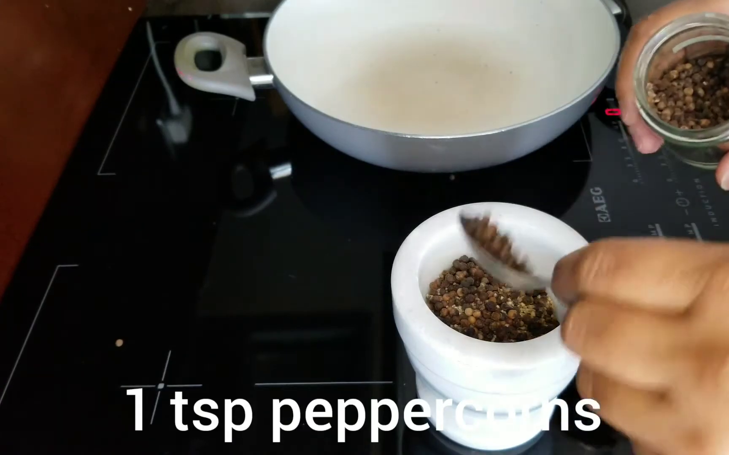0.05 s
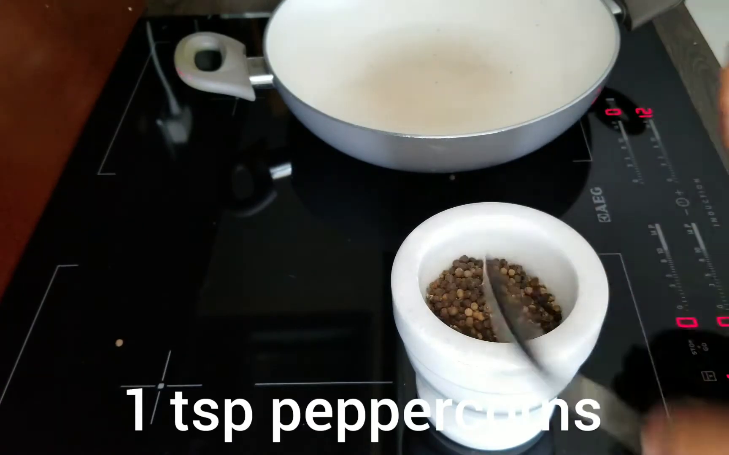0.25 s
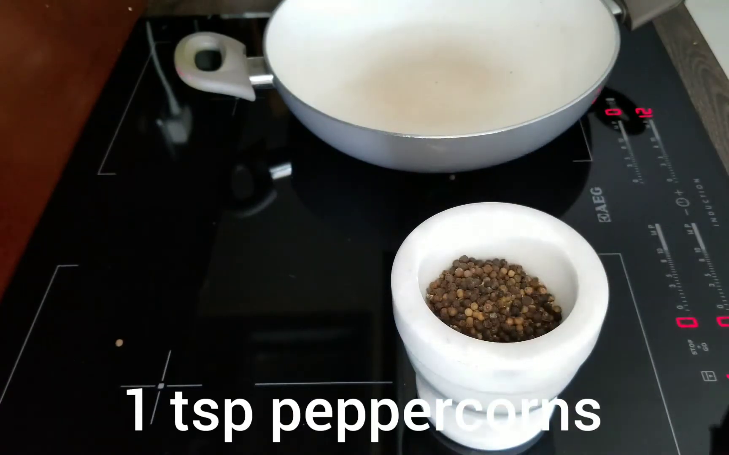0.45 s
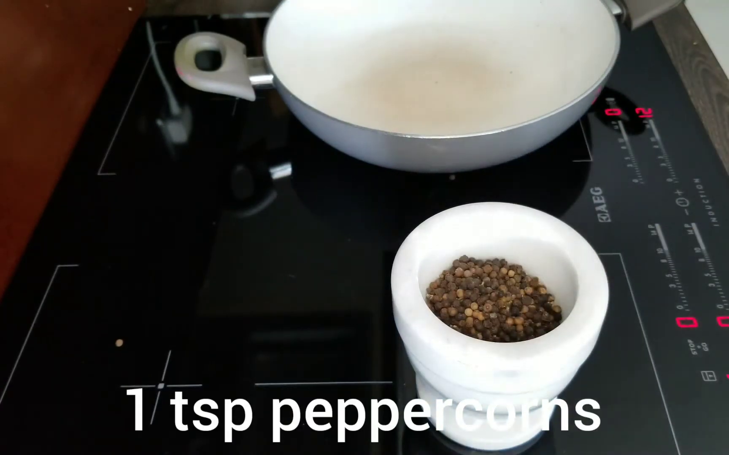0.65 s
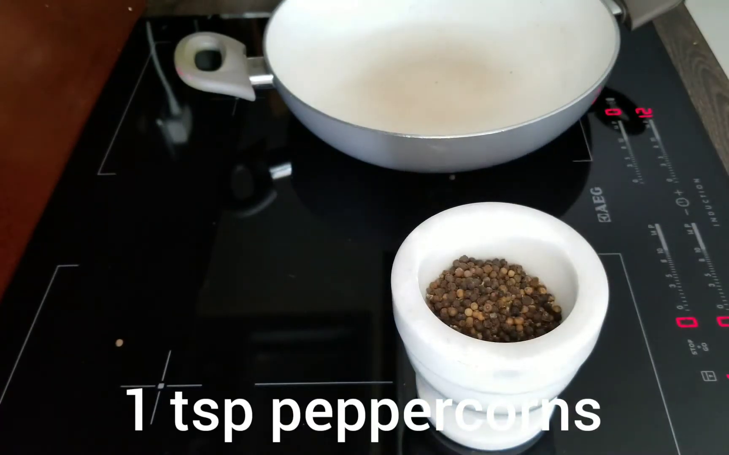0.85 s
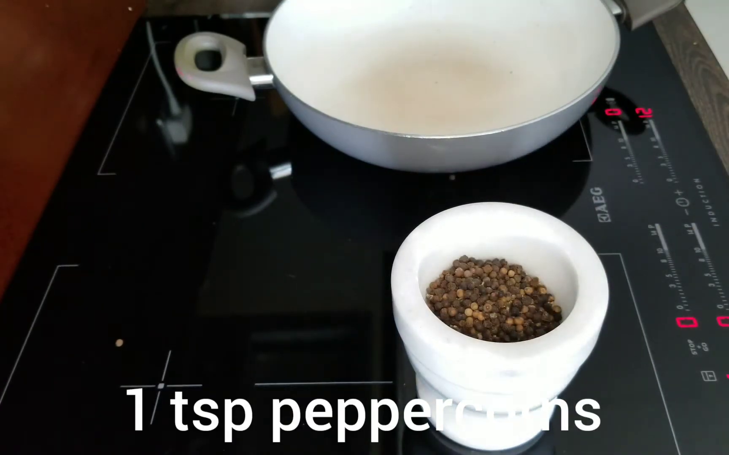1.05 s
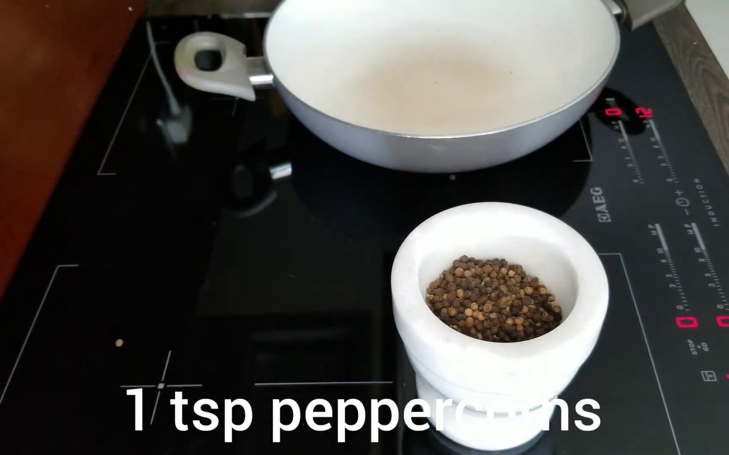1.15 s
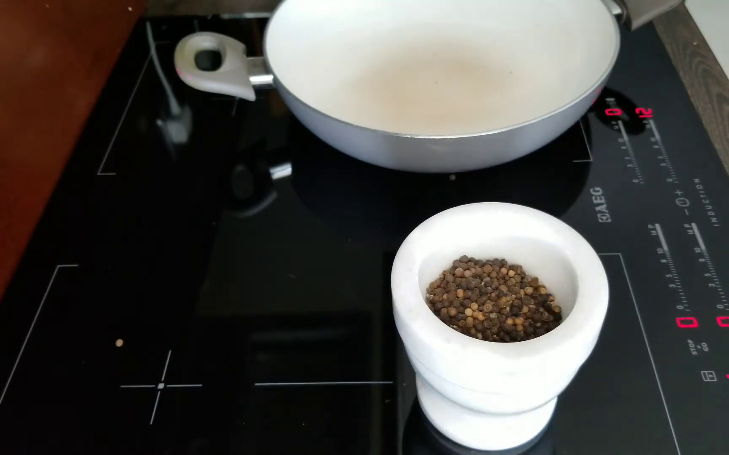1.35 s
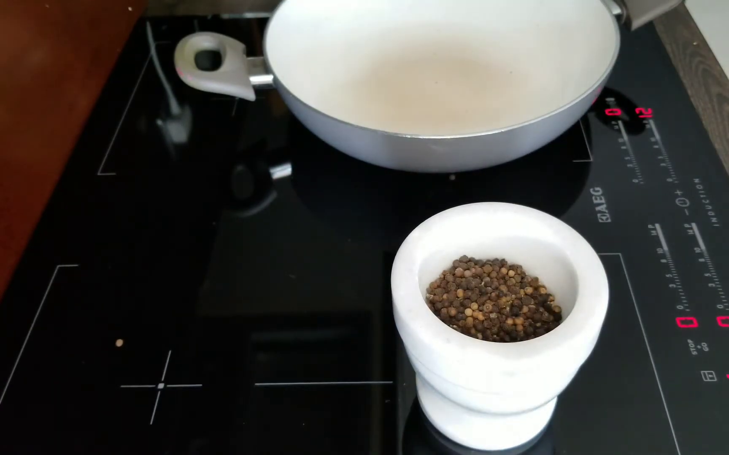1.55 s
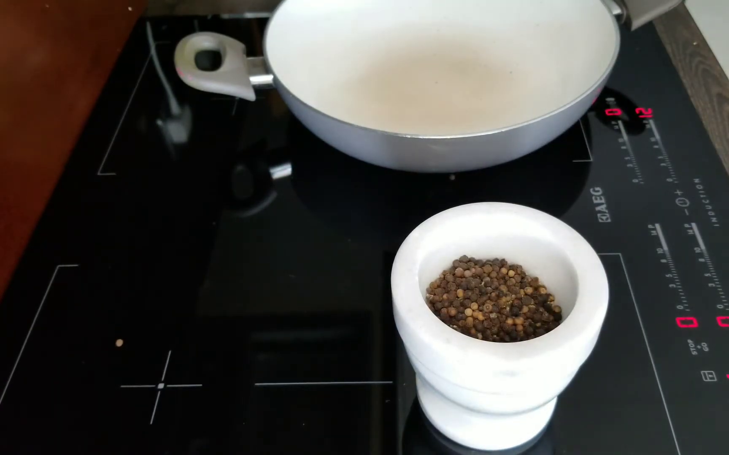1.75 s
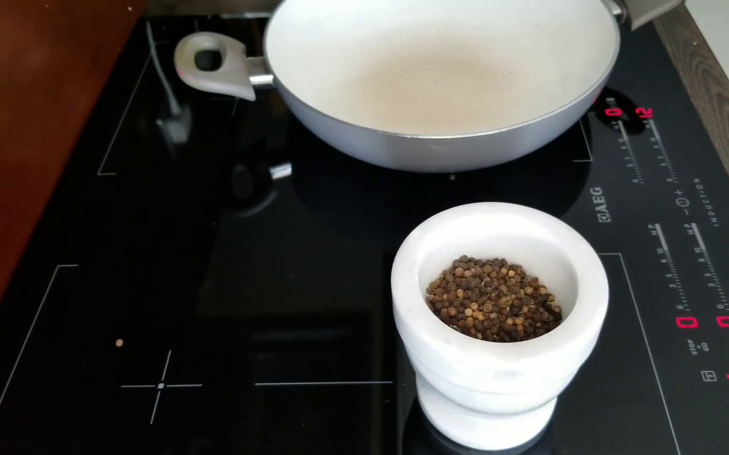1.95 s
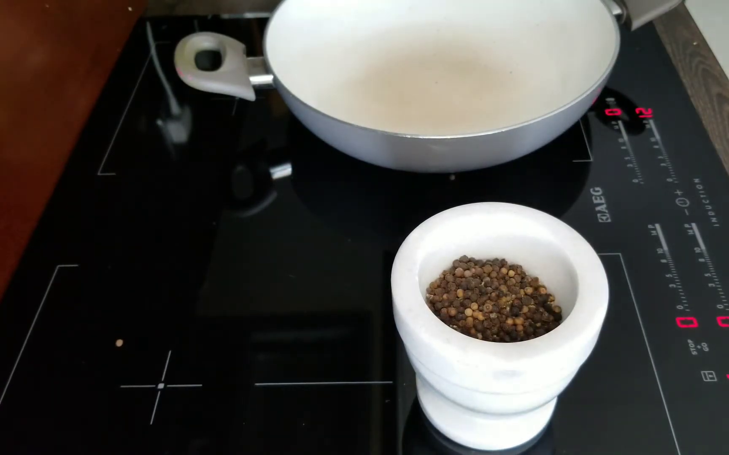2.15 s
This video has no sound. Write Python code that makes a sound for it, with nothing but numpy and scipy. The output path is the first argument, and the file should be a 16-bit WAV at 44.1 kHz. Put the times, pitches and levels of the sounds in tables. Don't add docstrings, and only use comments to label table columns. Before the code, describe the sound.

A metal spoon clatters in a glass jar, close up in a small kitchen with a low fan hum. Light taps on a stone rim at 0.24 seconds lead to a bright, ringing rattle from 0.43 to 0.7. Duller lid knocks and scrapes follow at 0.88-1.12, faint sleeve rubs and lid slides at 1.25-1.8, then woody jar set-downs at 1.88 and, softer, 2.13.

```python
import sys
import numpy as np
from scipy import signal
from scipy.fft import rfft, irfft
from scipy.io import wavfile

SR = 44100
rng = np.random.default_rng(int(sys.argv[2]) if len(sys.argv) > 2 else 0)


def log_audio(samples):
    frames = np.atleast_2d(samples).T
    limited = np.clip(frames, -1, 1)
    pcm = np.round(limited * 32767).astype(np.int16)
    wavfile.write(sys.argv[1], SR, pcm)


def convert_level_to_amplitude(level_db):
    exponent = np.asarray(level_db, float) / 20
    return 10 ** exponent


N = 97020
T = np.arange(N) / SR

# pitch_hz, level_db (rms), wobble_db
FAN_LINES = [(59.5, -66, 4), (132.9, -48, 1.2), (265.5, -66, 2.2), (398.5, -68, 2.2), (2290, -84, 1.5)]
# freq_hz, level_db
AIR_SPECTRUM = [(20, -27.5), (135, -4.5), (217, -21), (405, -19.5), (500, -28), (1560, -38.5),
                (15600, -43.5), (16000, -70.5)]
# freq_hz, likeness (0 to 1)
AIR_LIKENESS = [(60, .94), (290, 0.48), (640, 0.23), (1400, 0.084)]
# time_s, gain_db
RECORDER_GAIN = [(0, -2), (.43, 0), (.56, -4), (1.05, -8.5), (1.5, -2.5), (1.85, -2), (2.2, 2)]
# freq_hz, t60_s
ROOM_DECAY = [(150, 0.49), (750, 0.36), (4000, 0.27), (16000, 0.074)]

# start_s, length_s, level_db
SLEEVE_RUBS = [
    (1.25, 0.051, -12.5),
    (1.355, 0.085, -6.5),
    (1.881, 0.014, 9),
    (1.89, 0.042, -4),
]
# freq_hz, level_db
RUB_SPECTRUM = [(1500, -18), (4000, 7.5), (8000, 8.5), (16000, 4.5)]
# start_s, length_s, level_db
LID_SLIDES = [(1.42, .13, -72), (1.48, .09, -75), (1.70, .09, -73), (1.74, .12, -80)]
# pitch_hz, level_db, t60_s, left_over_right_db, left_lead_rad
SLIDING_LID_MODES = [(3625, -4.5, 0.016, 3.5, 1.76), (8340, 0.5, 0.01, 1, 1.6), (9040, 3, 0.01, -3, 1.7),
                     (15550, -4, 0.018, -3, 1.5)]

# pitch_hz, level_db, t60_s
WORKTOP_MODES = [(171, -3, 0.11), (296, -1.5, 0.078), (433, -5, 0.055), (522, -7, 0.047),
                 (650, -4.5, 0.037), (880, -12.5, 0.056), (1170, -15, .1), (1330, -19, 0.026),
                 (1900, -2.5, 0.01), (3630, -11.5, 0.017), (7000, -24.5, 0.034)]
# start_s, level_db, chatter_decay_s, favoured_hz, second_favoured_hz
WORKTOP_HITS = [
    (1.883, -16, 0.00079, 430, 650),
    (1.89, -23.5, 0.0036, 297, 880),
    (1.903, -30, 0.0075, 1170, 7000),
    (1.925, -37.5, .015, 300, 171),
    (1.953, -35, 0.0093, 430, 1170),
    (1.981, -62, 0.0089, 300.5, 430),
    (2.125, -27, 0.0018, 493, 3300),
    (2.133, -27.5, 0.0019, 296, 522),
    (2.139, -29, 0.0012, 296, 1900),
    (2.16, -41, .008, 522, 1170),
]
# freq_hz, level_db (per Hz)
WORKTOP_CRACK = [(120, -14.5), (250, -1.5), (600, 0.5), (2800, -21), (7000, -42), (10000, -64)]

# pitch_hz, level_db, t60_s
LID_MODES = [(325, -2.5, 0.031), (430, -4.5, 0.043), (540, -6.5, 0.05), (736, -11.5, .04),
             (990, 0.5, 0.035), (1203, -5, 0.049), (2005, -1.5, 0.027), (3310, -9, 0.013),
             (4980, -4.5, 0.0096), (6560, -2.5, 0.0067)]
# start_s, level_db, chatter_decay_s, favoured_hz, second_favoured_hz
LID_CONTACTS = [(.881, -27, 0.0088, 2005, 706), (.890, -32, .004, 3310, 700),
                (.896, -33, 0.0021, 1108, 4980), (.904, -35.5, 0.0063, 1120, 560),
                (.929, -24.5, 0.0046, 540, 4980), (.948, -28.5, 0.0037, 1120, 3310),
                (.953, -27, .003, 430, 3310), (1.004, -46.5, 0.0084, 444, 1100),
                (1.068, -59, 0.0091, 477, 540), (1.078, -43, 0.0037, 1043, 507),
                (1.087, -46.5, 0.0071, 1090, 2005), (1.105, -38, 0.0033, 990, 3310),
                (1.112, -34, 0.0045, 325, 1070), (1.119, -45.5, 0.0023, 1050, 3310)]
# start_s, length_s, level_db
LID_DRAGS = [(.955, .08, -56), (1.055, .08, -47), (1.085, .045, -46)]
# freq_hz, level_db (per Hz)
LID_CRACK_SPECTRUM = [(220, -30), (500, -3.5), (1300, -8), (1900, -11), (2600, -8.5), (3400, -1),
                      (5000, -9), (16000, -19)]

# pitch_hz, level_db, t60_s
GLASS_MODES = [(1172, -2.5, 0.017), (1700, -1.5, 0.036), (1592, -5, 0.013), (2300, 3.5, 0.03),
               (3300, -11.5, 0.023)]
# start_s, level_db, chatter_decay_s, favoured_hz
GLASS_KNOCKS = [(.419, -40, 0.0023, 1420), (.452, -22.5, 0.00033, 1710), (.487, -21.5, 0.003, 1900),
                (.669, -25.5, 0.0042, 1120)]
# freq_hz, level_db (per Hz)
GLASS_CRACK_SPECTRUM = [(250, -24), (900, -8.5), (2000, -6), (4500, -7), (9000, -24.5), (16000, -40)]

SPOON_PITCHES = [1030, 1590, 2560, 3250, 4010, 5050, 5380, 7150, 9960, 11200, 12200, 14800]
# level_db, t60_s, left_over_right_db, left_lead_rad
SPOON_RINGING = [(-9.5, 0.019, 3.5, -1.5), (-9, 0.049, 12, 6.5), (-13.5, 0.12, 4, 4), (-11, .05, 4.5, -1),
                 (-5, .05, -2, -1.5), (-11.5, .03, 8.5, 2.1), (-8.5, .05, 3, 2), (-8, 0.049, 14, 2),
                 (-8.5, .08, 2, -2), (-6.5, 0.062, 11, -1.2), (-7, 0.061, 8.5, -2), (-6.5, .08, 11.5, -3.5)]
# start_s, level_db, chatter_decay_s, favoured_hz, second_favoured_hz
MORTAR_HITS = [
    (.2402, -23.5, 0.0044, 11180, 4007),
    (.2453, -24, 0.0054, 11260, 1640),
    (.255, -25.5, 0.0083, 15170, 4010),
    (.272, -39, 0.013, 9896, 12320),
    (.285, -46.5, 0.0026, 7130, 14580),
    (.314, -49, 0.0052, 11200, 4010),
    (.3436, -43, 0.011, 1057, 7040),
    (.349, -45, 0.0042, 2758, 9910),
]
# freq_hz, level_db (per Hz)
MORTAR_CRACK = [(250, -21), (1300, -3.5), (2500, -12), (4500, -6.5), (7000, -8), (16000, -17)]

JAR_PITCHES = [3899, 5390, 5728, 6370, 6945, 7062, 8820, 9435, 11103, 11143, 12211, 12252, 15195, 15400]
# level_db, t60_s, left_over_right_db, left_lead_rad
JAR_RINGING = [(-9, 0.2, -11, 4), (-12.5, 0.26, -1.5, -2.5), (-10, .2, -2, -1.5), (-17, .041, 6, -1.07),
               (-13.5, 0.1, 7, 2.5), (-5.5, 0.24, 5.5, -2.5), (-8.5, 0.21, 8.5, 0.5),
               (-18.5, 0.38, -5.5, 0.94), (-16, .12, 7, 1.5), (-2, .13, 7, -4.5), (-6, 0.02, 15.5, -2.25),
               (-9, 0.093, 15, -2.2), (-12, 0.09, 7.5, -2.1), (-9, .1, 11.5, 4.5)]
# start_s, level_db, chatter_decay_s, favoured_hz, second_favoured_hz
JAR_CONTACTS = [(.4308, -12.5, 0.024, 7000, 16500), (.4365, -17, 0.0043, 8820, 5390),
                (.4702, -11, 0.0041, 12600, 5800), (.476, -13.5, 0.0048, 3899, 8820),
                (.4947, -9.5, 0.0011, 11143, 8820), (.503, -18, 0.0063, 3899, 5160),
                (.5171, -8, 0.0064, 10800, 6200), (.546, -8, 0.00067, 11900, 5940),
                (.5555, -25, 0.0016, 11100, 15300), (.568, -11.5, 0.001, 11143, 8600),
                (.588, -13, .002, 9000, 11600), (.596, -17.5, 0.0015, 12230, 7062),
                (.613, -20.5, 0.0025, 11143, 6370), (.631, -29.5, 0.0024, 7062, 3899),
                (.6408, -22, 0.0099, 8820, 12200), (.650, -22.5, 0.0044, 8600, 10300),
                (.665, -43.5, .003, 8800, 11143), (.678, -40, 0.0045, 3899, 5728),
                (.71, -50.5, 0.0039, 8770, 7062)]
# start_s, length_s, level_db
JAR_DRAGS = [(.43, .25, -24)]
# freq_hz, level_db (per Hz)
JAR_CRACK_SPECTRUM = [(250, -19.5), (1200, -7.5), (3600, -4), (4400, -11.5), (6000, -2.5), (12500, -12),
                      (13300, -45.5), (16000, -45.5)]

TOUCHES_PER_S, TOUCH_SPREAD_DB = 2500, 4.5
MIC_LAG_S, MIC_LOW_HZ = -.00016, 131
ONSET_S = 0.00025
AIR_DB, ROOM_DB = -58.5, -16.5
RUB_DB, SLIDE_DB = -63.5, -1
TICK_S, TICK_DB = 1.521, -41


def at_hz(points, hz):
    table_hz, values = np.transpose(points)
    return np.interp(np.log(hz + 1), np.log(table_hz), values)


def colour(x, spectrum):
    size = 2048
    cepstrum = irfft(np.log(convert_level_to_amplitude(at_hz(spectrum, np.fft.rfftfreq(size, 1 / SR)))))
    cepstrum[1:size // 2] *= 2
    cepstrum[size // 2 + 1:] = 0
    response = irfft(np.exp(rfft(cepstrum)))
    return signal.fftconvolve(x, response[None], axes=1)[:, :N]


def drift(rate_hz):
    r = np.exp(-80 * np.pi * rate_hz / SR)
    noise = rng.standard_normal(N // 40 + 2002)
    slow = signal.lfilter([1], [1, -2 * r, r * r], noise)[2000:]
    return np.interp(np.arange(N) / 40, np.arange(len(slow)), slow / slow.std())


def strokes(rows):
    return sum(convert_level_to_amplitude(db) * np.sin(np.pi * np.clip((T - s) / length, 0, 1)) for s, length, db in rows)


def touches():
    sizes = convert_level_to_amplitude(TOUCH_SPREAD_DB * rng.standard_normal(N)) * rng.choice([-1, 1], N)
    return sizes * (rng.random(N) < TOUCHES_PER_S / SR)


def ring(clicks, hz, db, t60, pan_db=0, lead=None, stops=(), keeps=()):
    if lead is None:
        lead = 2 * np.pi * hz * MIC_LAG_S
    pole = convert_level_to_amplitude(-60 / (t60 * SR)) * np.exp(2j * np.pi * hz / SR)
    parts, state = [], np.zeros(1, complex)
    for part, keep in zip(np.split(clicks + 1e-18, list(stops)), [1, *keeps]):
        z, state = signal.lfilter([1], [1, -pole], part, zi=keep * state)
        parts.append(z)
    rise = np.exp(-1 / (ONSET_S * SR))
    turn = rise * np.exp(2j * np.pi * hz / SR)
    z = signal.lfilter([(1 - rise) ** 2], [1, -2 * turn, turn ** 2], np.concatenate(parts))
    left = convert_level_to_amplitude(pan_db / 2) * z.imag
    right = convert_level_to_amplitude(-pan_db / 2) * (z * np.exp(-1j * lead)).imag
    return convert_level_to_amplitude(db) * np.array([left, right])


def struck(hits, modes, crack, drag, spread_db, chatter_db, crack_db, crack_s, pan_db, place_db, grip):
    chatter = convert_level_to_amplitude(chatter_db) * touches()
    luck = rng.standard_normal((len(hits), 2, 14))
    shapes, puff = [], drag
    for s, db, decay, *_ in hits:
        shape = convert_level_to_amplitude(db) * chatter * (T >= s) * np.exp(-np.abs(T - s) / max(decay, 1e-4))
        shape[int(s * SR)] = convert_level_to_amplitude(db)
        shapes.append(shape)
        puff = puff + convert_level_to_amplitude(db) * (T >= s) * np.exp(-np.abs(T - s) / (decay + crack_s))
    place_hz = np.array(hits)[:, 3:]
    stops = (np.array(hits)[:, 0] * SR).astype(int)
    out = 0
    for k, mode in enumerate(modes):
        octaves_away = np.abs(np.log2(mode[0] / place_hz)).min(axis=1)
        close = convert_level_to_amplitude(-place_db * octaves_away)
        share = np.sign(luck[:, 1, k]) * convert_level_to_amplitude(spread_db * luck[:, 0, k]) * close
        clicks = share @ shapes + drag * np.roll(chatter, 97 * k)
        keeps = 1 - np.clip(grip, 0, 1) * close
        out = out + ring(clicks, *mode, stops=stops, keeps=keeps)
    grit = puff * (rng.standard_normal((2, N)) * 0.34 + touches())
    grit[1] = np.roll(grit[1], int(MIC_LAG_S * SR))
    balance = convert_level_to_amplitude(np.array([[pan_db], [-pan_db]]) / 2)
    return (out + convert_level_to_amplitude(crack_db) * colour(grit, crack)) * balance


def fan():
    lines = 0
    for k, (hz, db, wobble_db) in enumerate(FAN_LINES):
        level = convert_level_to_amplitude(db + 3.0 + wobble_db * drift(4.3))
        lines = lines + level * np.sin(2 * np.pi * hz * T + 0.36 * drift(27.0) + k)
    hz = np.fft.rfftfreq(N, 1 / SR)
    alike = np.clip(at_hz(AIR_LIKENESS, hz), 0, 1)
    mid, side = rfft(rng.standard_normal((2, N))) * convert_level_to_amplitude(at_hz(AIR_SPECTRUM, hz))
    air = irfft(np.sqrt(1 + alike) * mid + np.sqrt(1 - alike) * side * [[1], [-1]], N)
    return lines * convert_level_to_amplitude(np.array([[1.3], [-1.3]])) + convert_level_to_amplitude(AIR_DB) * air / air.std()


def kitchen(x):
    t, tail = T[:SR // 2], 0
    for hz in 125 * 2.0 ** np.arange(8):
        edges = [hz * .7, min(hz * 1.41, 20000)]
        octave = signal.butter(2, edges, "band", fs=SR, output="sos")
        band = signal.sosfilt(octave, rng.standard_normal((2, len(t))))
        tail = tail + band * convert_level_to_amplitude(-60 * t / at_hz(ROOM_DECAY, hz))
    tail = tail * np.clip(t / 0.0019, 0, 1)
    return signal.fftconvolve(x, tail / np.sqrt(np.sum(tail ** 2) / 2), axes=1)[:, :N]


def fingers():
    slip = strokes(LID_SLIDES) * convert_level_to_amplitude(SLIDE_DB + 3.66 * drift(18.0)) * touches()
    tick = convert_level_to_amplitude(TICK_DB) * (np.arange(N) == int(TICK_S * SR))
    rub = strokes(SLEEVE_RUBS) * convert_level_to_amplitude(RUB_DB + 2.1 * drift(37)) * rng.standard_normal((2, N))
    ringing = sum(ring(slip, *mode) for mode in SLIDING_LID_MODES)
    return ringing + colour(rub + 0.8 * slip + tick, RUB_SPECTRUM)


def jar_on_worktop():
    return struck(WORKTOP_HITS, WORKTOP_MODES, WORKTOP_CRACK, 0, spread_db=-2.5, chatter_db=-12,
                  crack_db=10.0, crack_s=0.0082, pan_db=2.3, place_db=7, grip=0.18)


def lid_on_jar():
    return struck(LID_CONTACTS, LID_MODES, LID_CRACK_SPECTRUM, convert_level_to_amplitude(-11.5) * strokes(LID_DRAGS),
                  spread_db=0.3, chatter_db=-4.5, crack_db=11.5, crack_s=0.0022, pan_db=0.0,
                  place_db=21.5, grip=.6)


def spoon_on_mortar():
    modes = [(hz, *rest) for hz, rest in zip(SPOON_PITCHES, SPOON_RINGING)]
    return struck(MORTAR_HITS, modes, MORTAR_CRACK, 0, spread_db=-2.0, chatter_db=-4.5,
                  crack_db=10.0, crack_s=0.0066, pan_db=-0.5, place_db=10, grip=.7)


def jar_wall():
    return struck(GLASS_KNOCKS, GLASS_MODES, GLASS_CRACK_SPECTRUM, 0, spread_db=3.5, chatter_db=-7.5,
                  crack_db=11.5, crack_s=0.0051, pan_db=4.5, place_db=9.0, grip=.3)


def spoon_in_jar():
    modes = [(hz, *rest) for hz, rest in zip(JAR_PITCHES, JAR_RINGING)]
    return struck(JAR_CONTACTS, modes, JAR_CRACK_SPECTRUM, convert_level_to_amplitude(-3.3) * strokes(JAR_DRAGS),
                  spread_db=1.0, chatter_db=-17, crack_db=-1.0, crack_s=0.0088, pan_db=2.0,
                  place_db=28.5, grip=.85)


def scene():
    near = fingers() + jar_on_worktop() + lid_on_jar() + spoon_on_mortar() + jar_wall() + spoon_in_jar()
    near = signal.sosfilt(signal.butter(2, MIC_LOW_HZ, "high", fs=SR, output="sos"), near)
    gain = convert_level_to_amplitude(np.interp(T, *np.transpose(RECORDER_GAIN)))
    return near + convert_level_to_amplitude(ROOM_DB) * kitchen(near) + gain * fan()


def band_limit(x):
    return signal.sosfilt(signal.butter(12, 16830, fs=SR, output="sos"), x)


def record(dry):
    rounded = .95 * np.tanh(dry / .95)
    cut = signal.sosfilt(signal.cheby2(8, 40, 17000, fs=SR, output="sos"), rounded)
    return band_limit(cut)


dry = scene()
out = record(dry)
log_audio(out)
```